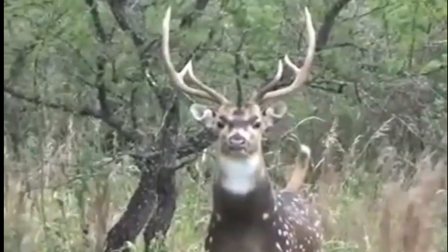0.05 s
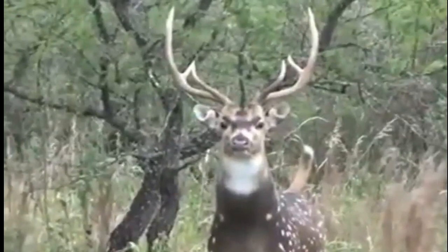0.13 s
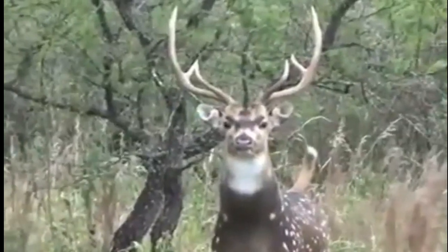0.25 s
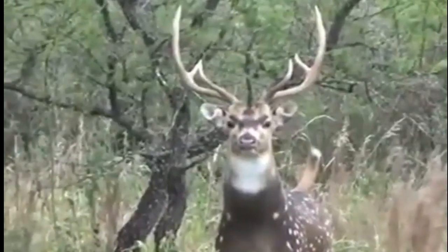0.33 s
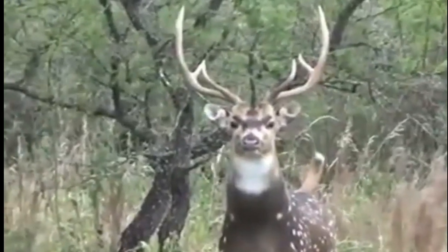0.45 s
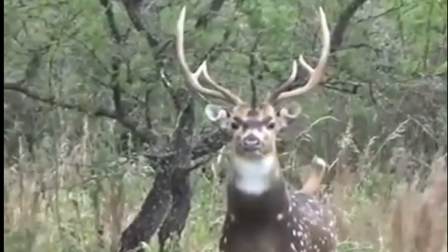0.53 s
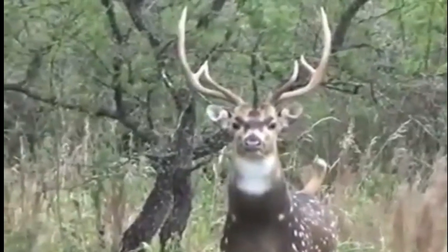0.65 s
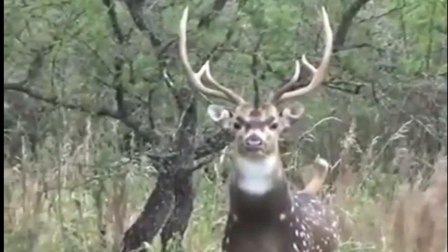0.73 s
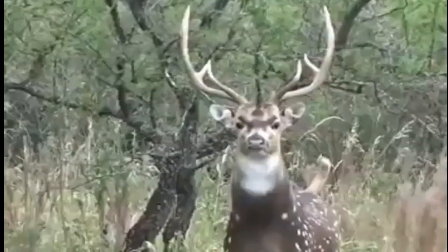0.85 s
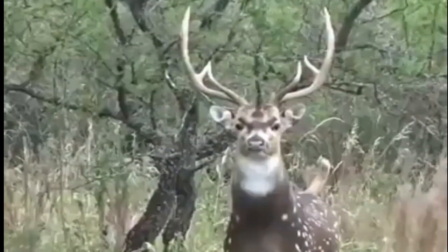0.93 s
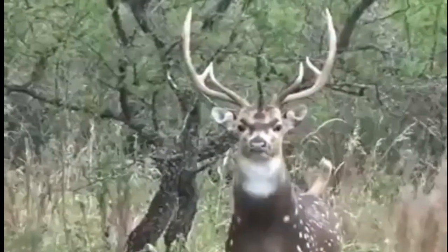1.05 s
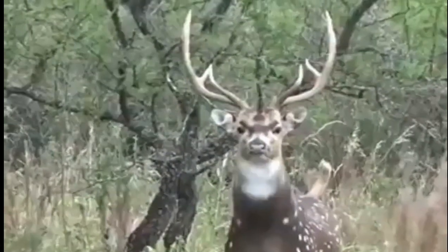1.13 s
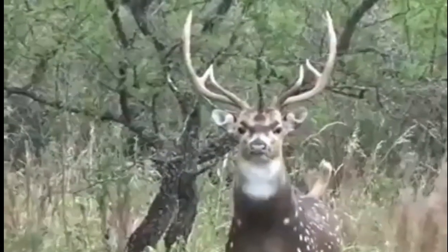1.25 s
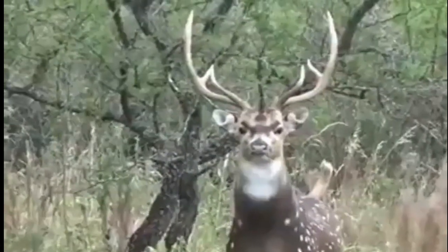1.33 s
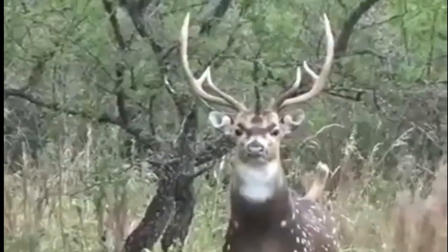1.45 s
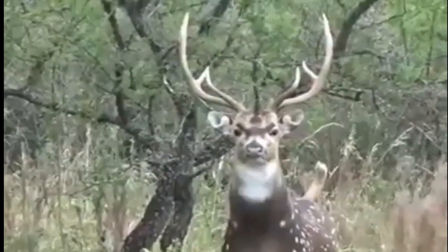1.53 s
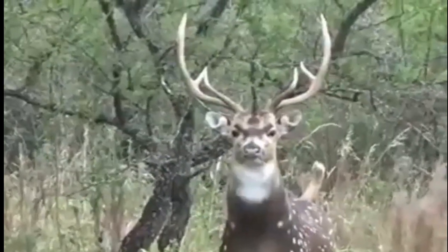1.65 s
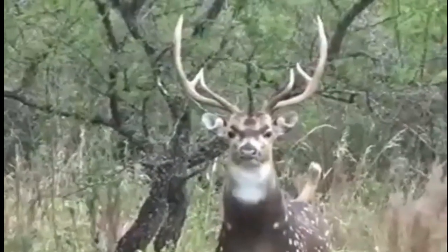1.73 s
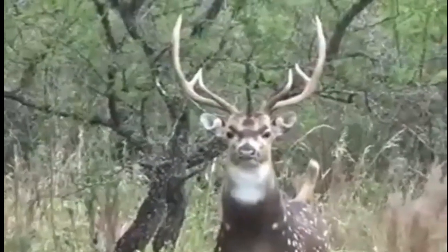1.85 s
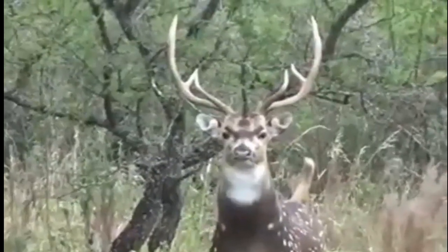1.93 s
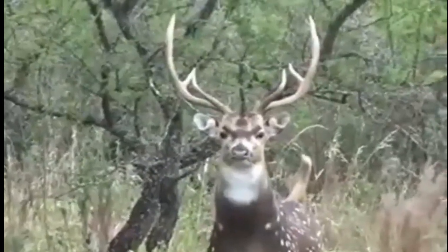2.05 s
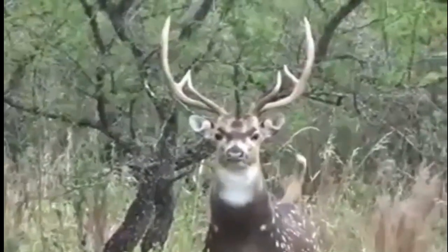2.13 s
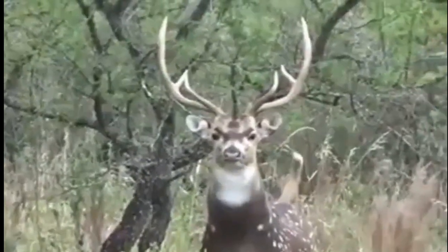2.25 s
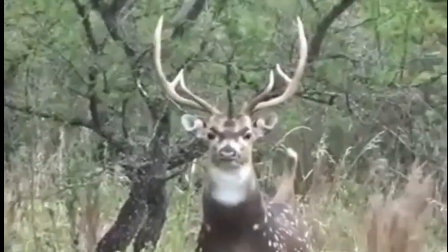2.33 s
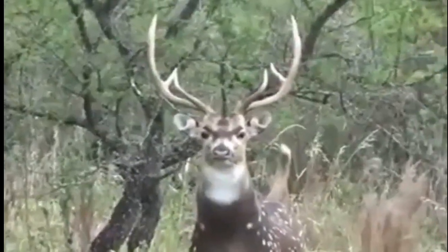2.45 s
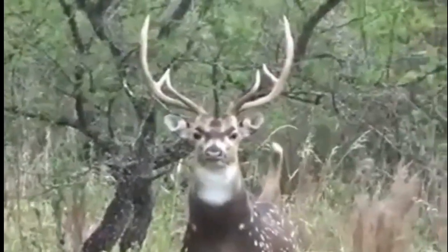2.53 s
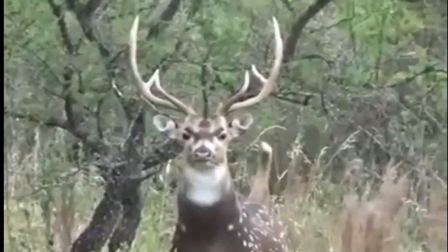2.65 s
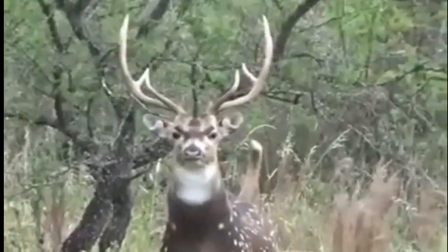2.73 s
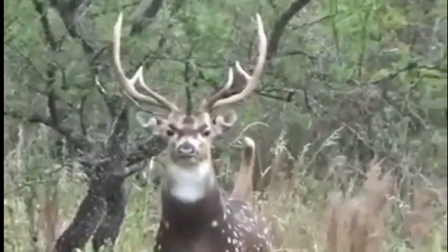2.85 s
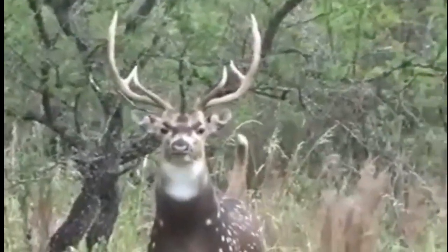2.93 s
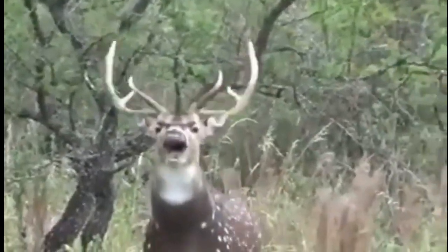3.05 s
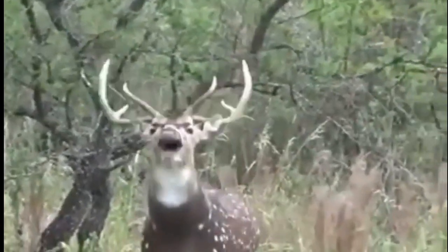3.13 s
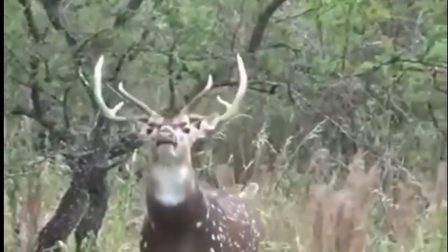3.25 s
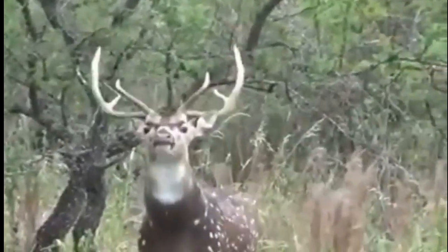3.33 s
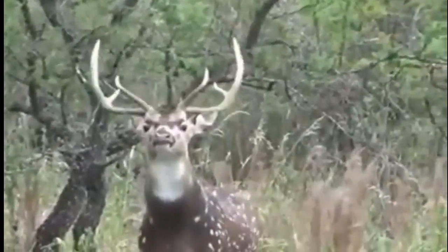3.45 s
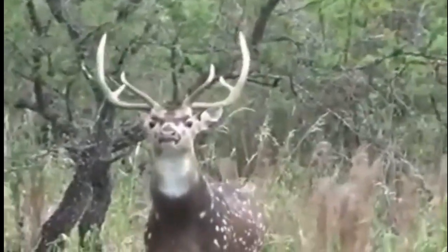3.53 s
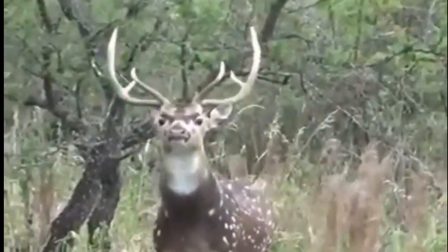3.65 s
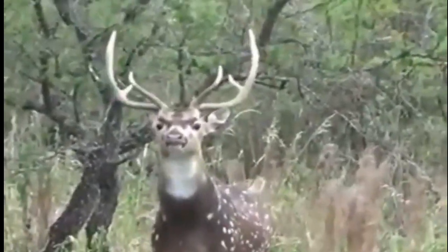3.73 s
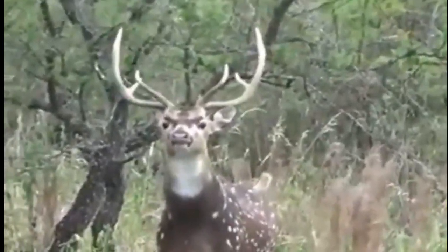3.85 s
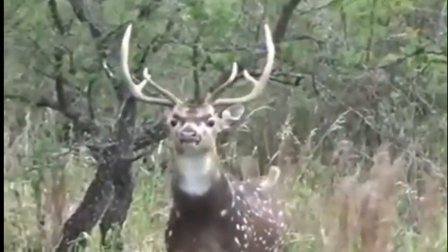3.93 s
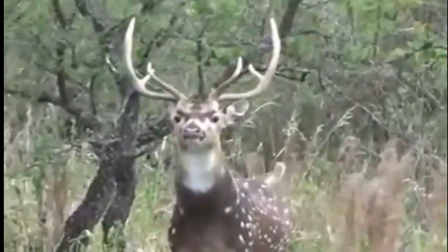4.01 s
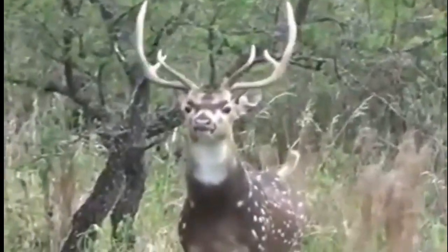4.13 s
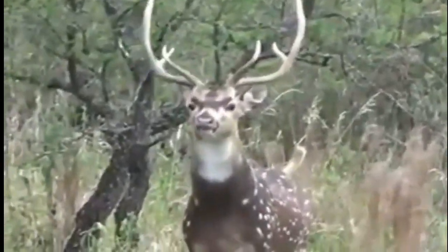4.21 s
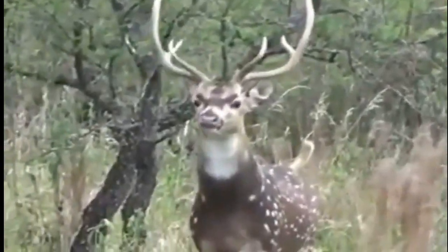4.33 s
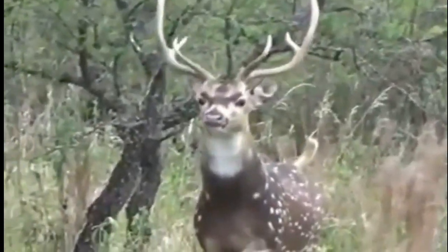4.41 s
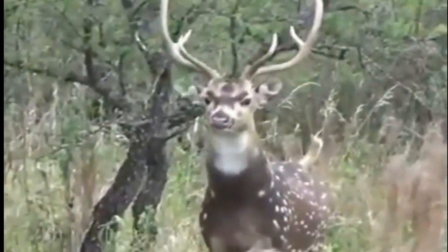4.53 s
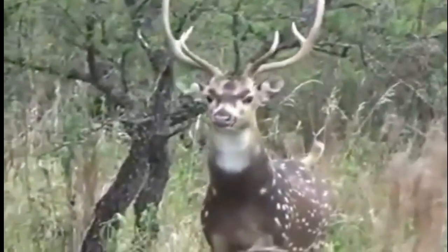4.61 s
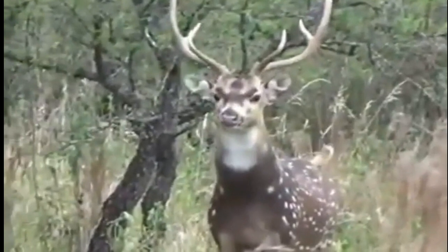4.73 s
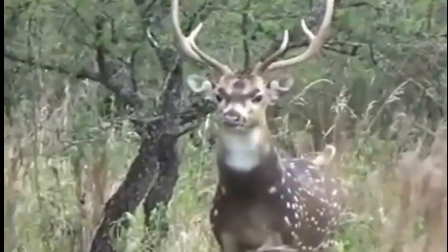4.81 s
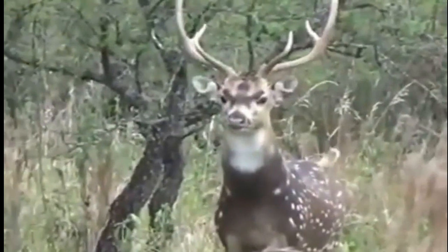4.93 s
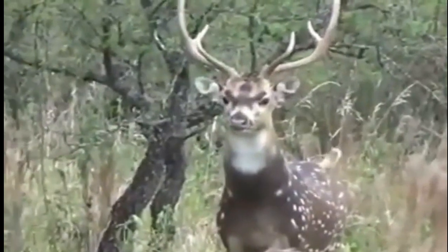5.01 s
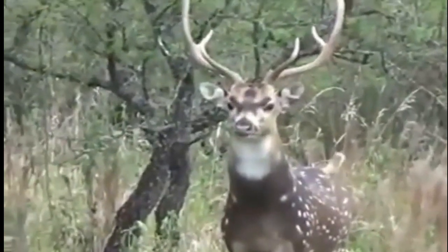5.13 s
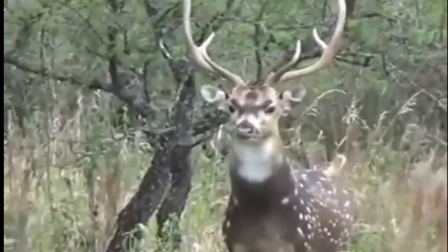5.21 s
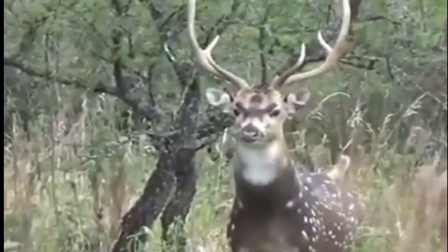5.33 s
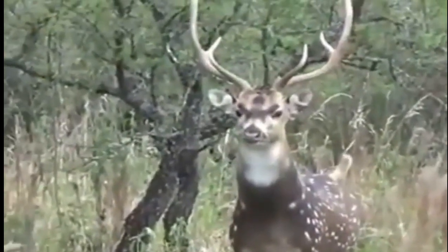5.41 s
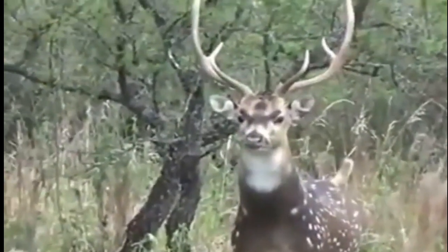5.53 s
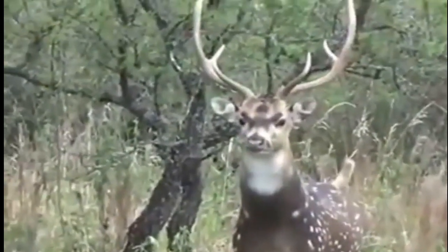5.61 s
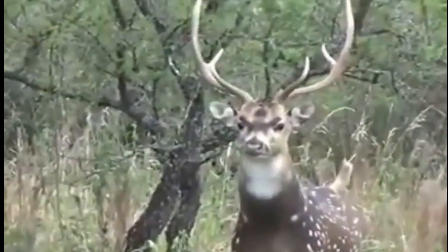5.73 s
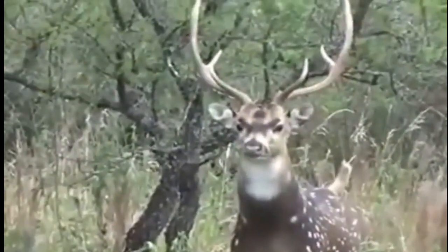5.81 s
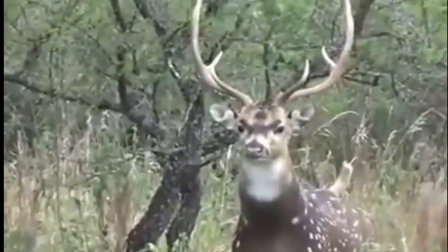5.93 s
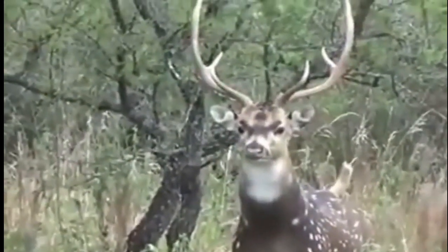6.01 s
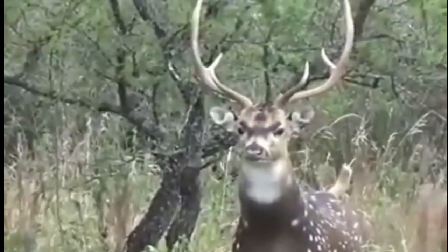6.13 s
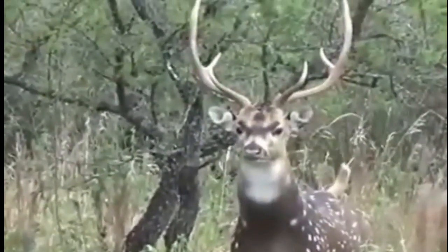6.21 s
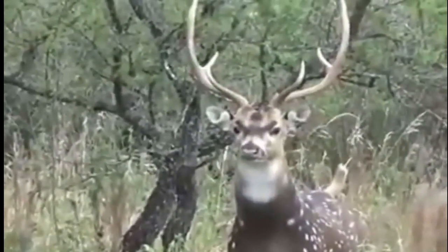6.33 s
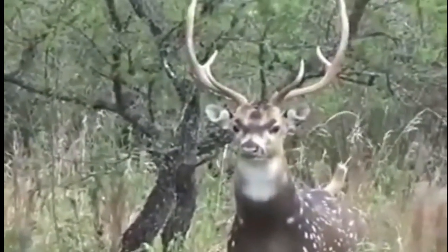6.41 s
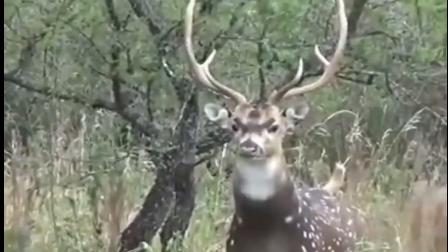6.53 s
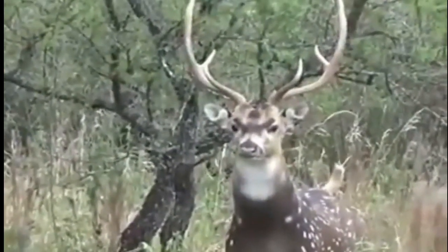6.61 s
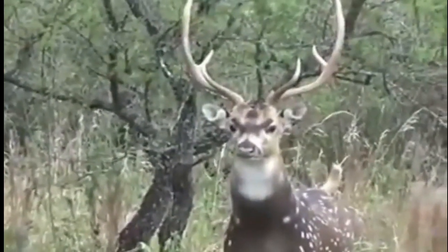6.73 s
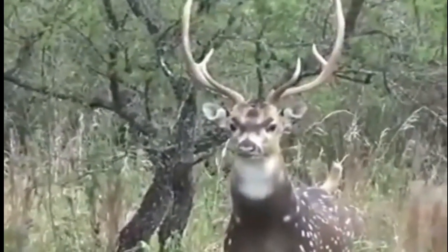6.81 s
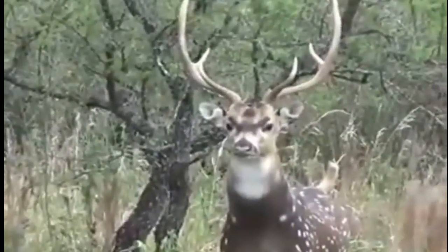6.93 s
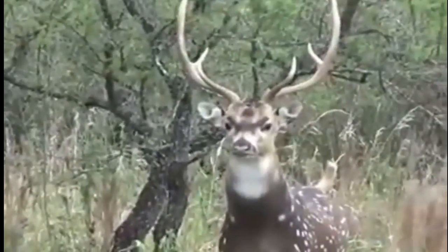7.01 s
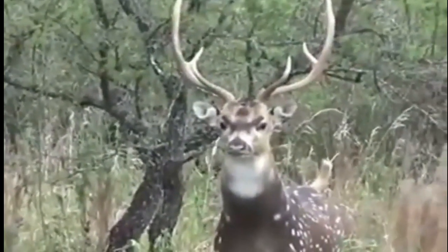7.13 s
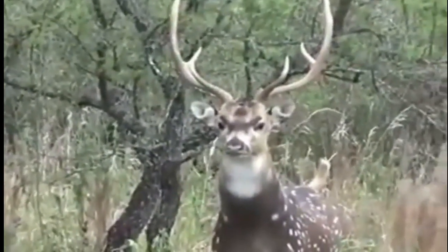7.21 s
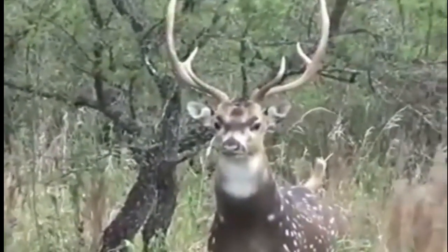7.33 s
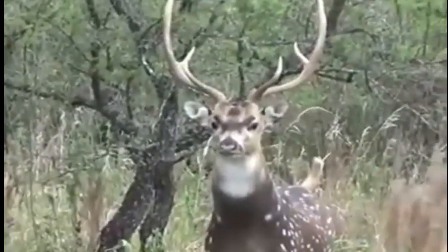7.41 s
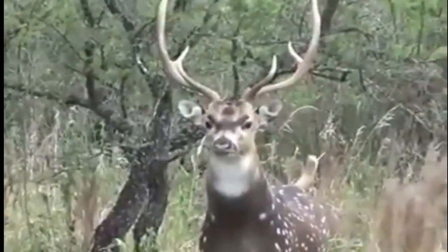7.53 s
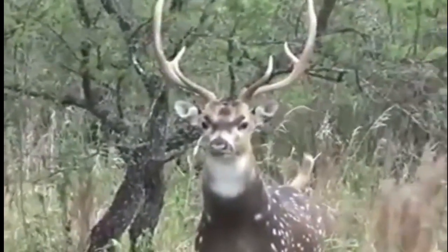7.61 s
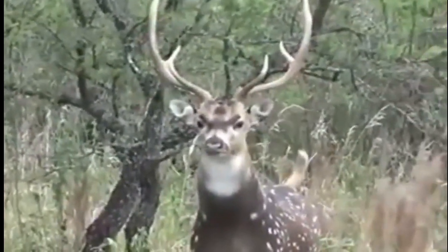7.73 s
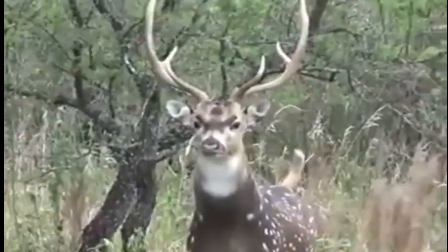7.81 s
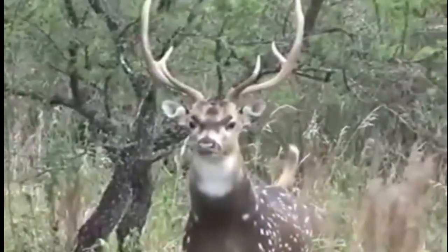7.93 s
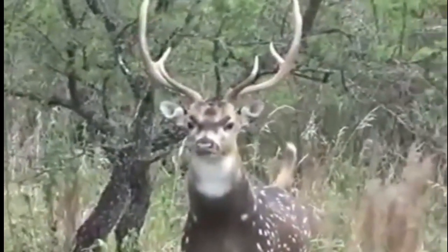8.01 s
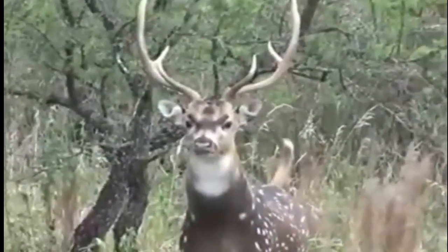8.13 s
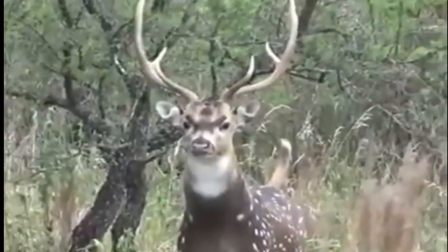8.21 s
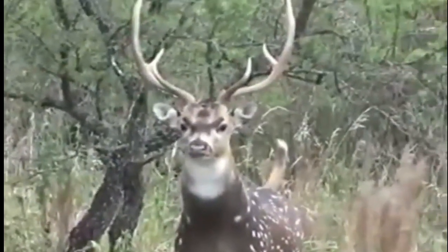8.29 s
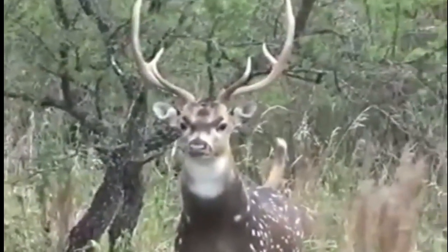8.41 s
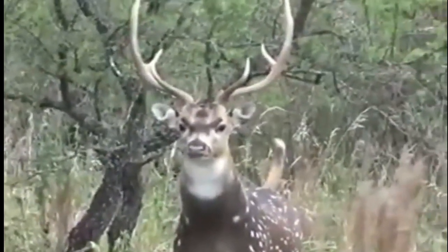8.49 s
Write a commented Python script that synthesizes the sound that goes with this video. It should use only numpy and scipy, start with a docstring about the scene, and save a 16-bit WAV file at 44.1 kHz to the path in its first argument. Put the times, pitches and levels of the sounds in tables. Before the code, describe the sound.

A soft, high cricket trill pulses throughout in runs with brief rests, over a faint insect chorus and quiet outdoor air. A very faint deer call sounds far off at about 0.5 seconds. Then a stag gives three loud, sharp alarm barks at about 1.7, 3.1 and 4.6 seconds, each roughly a third of a second long. Each is a high, nearly pure yelp with some rasp and breath that scoops up, holds and collapses in pitch, followed by a short echo from the trees. Two quieter, hoarser barks answer from farther away at about 5.4 and 7.5 seconds. Several small dry twigs snap, mostly between 3 and 6 seconds. Distant birds whistle faint short notes in the first second, near 3 seconds, and again from about 6.3 seconds on. The barks stand far above everything else.

```python
"""A cricket trills in paired wing strokes over a chorus of others, and far birds whistle.
Then a stag gives high alarm barks at the edge of a thicket, and other deer answer from farther off.
Each bark is a nearly pure tone from the vocal folds, with rasp and hissing breath; its pitch
scoops up, holds and collapses. The trees scatter each bark back. A few dry twigs snap,
and faint low tones hang in the soft, distant air."""
import sys
import numpy as np
from scipy import signal
from scipy.fft import rfft, irfft
from scipy.io import wavfile

SR = 44100
rng = np.random.default_rng(int(sys.argv[2]) if len(sys.argv) > 2 else 0)


def log_audio(samples):
    """Write samples as a 16-bit WAV file to the path given in sys.argv[1]."""
    # one column per channel
    frames = np.atleast_2d(samples).T
    # limit to full scale, then quantise
    limited = np.clip(frames, -1, 1)
    pcm = np.round(limited * 32767).astype(np.int16)
    wavfile.write(sys.argv[1], SR, pcm)


N = 377496

# How long the woods ring: f/Hz, time to fade by 60 dB/s
WOODS_FADE = [(300, 0.85), (1000, 1.52), (2100, 1.61), (4000, .7), (9000, .35)]
# How alike the two ears hear the background: f/Hz, likeness (1 = the same)
EAR_LIKENESS = [(30, 1), (70, .88), (140, .4), (300, .25), (700, 0.31), (2000, 0.33), (6000, 0.23),
                (12000, .3)]
# Tone colours, saying how strong each frequency is: f/Hz, relative level/dB
ECHO_COLOUR = [(300, -0.5), (1000, 4), (2100, -3.5), (4000, -4), (10000, -14.5)]  # sound scattered by trees
AIR_COLOUR = [(15, -41.5), (25, -9), (92, -2.5), (119, -2), (382, -4), (436, -3.5), (487, -4), (663, -0.5),
              (1740, -11.5), (3230, -9.5), (4800, -15), (6240, -42), (10600, -120)]  # distant air
INSECT_COLOUR = [(4000, -22.5), (4800, -15.5), (5450, -2), (5950, -9), (6400, 1.5), (6750, -11.5),
                 (7200, -24.5), (9000, -19.5), (10500, -27.5), (11900, -16.5), (13000, -32)]  # countless far insects
RASP_COLOUR = [(100, -35), (420, -24.5), (650, -6.5), (1000, -18.5), (1450, -7.5), (1950, 1), (2450, -8.5),
               (3450, -3), (3800, -9.5), (4200, -19.5), (5200, -19), (7000, -30.5), (14000, -55)]  # a hoarse throat
HISS_COLOUR = [(1500, -33.5), (3000, -5), (4400, -8), (5300, -6), (6500, -7), (7500, 0.5), (8700, 0),
               (10200, 0), (11500, -7), (13500, -21.5)]  # escaping breath
OVERTONE_COLOUR = [(3000, 1.5), (4300, 7), (5400, -0.5), (6500, -3.5), (7600, 1), (8700, 2), (9800, -15.5),
                   (11000, -15.5), (13000, -20.5)]  # a bark's harmonics 4 to 12 (multiples of its pitch)
RUMBLE_COLOUR = [(25, -6), (85, -4), (200, -6), (400, -8), (800, -11), (3000, -40)]  # low rumble of the overloaded microphone under the loudest barks
# Faint far tones: t/s, length/s, f/Hz, level/dB
FAR_TONES = [(-.1, .48, 436, -64.5), (3.6, 0.56, 187, -68.5), (3.622, 0.394, 373.5, -67),
             (8.05, 0.512, 454.3, -71)]
# Far crickets: f/Hz, stroke rate/Hz, level/dB
FAR_CRICKETS = [(6500, 16, -59.5), (6280, 29, -62.5), (6603, 42, -63), (5420, 35, -58.5)]
# Bird notes: t/s, length/s, middle f/Hz, arch/share of f (below 0: a dip), buzz/share of f, level/dB
BIRD_NOTES = [(0.264, 0.106, 4010, .175, 0.03, -58.5), (.528, .059, 3920, .2, 0.0047, -53.5),
              (0.585, 0.04, 2700, -.06, .005, -54.5), (0.754, 0.2143, 3116, .12, .005, -56.5),
              (2.997, 0.0623, 3320, .095, .022, -56.5), (6.28, 0.0743, 3160, .04, 0.0445, -54.5),
              (6.425, 0.047, 3260, .06, .07, -57), (6.511, 0.028, 3540, .18, .047, -56.5),
              (6.57, .095, 3310, .075, 0.055, -54), (6.917, .059, 3700, .115, .018, -58.5),
              (7.825, .069, 3000, -0.015, 0.0098, -60), (8.127, .077, 3100, -0.33, 0.0093, -57.5),
              (8.343, 0.0728, 3450, .145, 0.018, -55.5)]
# Runs of the near cricket: first chirp t/s, last chirp t/s, level/dB
CRICKET_RUNS = [(-.005, 0.511, -45.5), (0.664, 1.299, -45), (1.685, 2.707, -46.5), (2.93, 3.153, -47),
                (3.426, 4.395, -47), (4.643, 5.499, -46), (5.807, 6.497, -45), (6.689, 7.204, -44.5),
                (7.42, 8.228, -45), (8.449, 8.563, -45)]
# Snapping twigs: t/s, peak level before gain_db/dB, centre f/Hz, time to fade by 60 dB/s
TWIG_SNAPS = [(1.136, -47, 2950, 0.078), (3.115, -38, 1865, 0.044), (3.534, -30, 2490, 0.049),
              (3.6, -41, 1000, 0.048), (3.832, -31.5, 2618, .035), (4.3, -31.5, 1396, 0.026),
              (4.588, -30.5, 1680, 0.023), (5.707, -41, 2520, 0.057), (6.044, -28.5, 956, 0.033)]
# The course of each bark: t/s, length/s, f/Hz, scoop/share of f, hold/s, fall/share of f, attack/s,
# release/s, level/dB, drift/(dB per s), second harmonic/dB, third harmonic/dB, breath/dB (these three
# relative to the level), swell time after the start/s, strain (-1 to 1)
BARK_SHAPES = [ (.485, 0.25, 1287, 0.027, 0.077, .24, 0.012, 0.089, -46.5, 12, -17, -39, -30, .075, 0.15),
               (1.654, 0.35, 1056, .112, .187, 0.4, 0.026, 0.099, -15.5, 2, -3, -34, -33.5, .125, -0.23),
               (3.134, 0.27, 1101, 0.22, 0.11, 0.54, 0.017, 0.071, -15.5, 8.5, -0.65, -23.5, -23, 0.11, 0.63),
               (4.622, 0.33, 1082, 0.19, 0.16, 0.44, 0.053, 0.1, -13, -10.5, -3.5, -31, -32.5, 0.049, 0.26),
               (5.446, .189, 1257, .088, .127, 0.44, 0.021, 0.036, -29.5, -52.5, -6, -24.5, -16, 0.097, 0),
               (7.489, 0.2, 1110, 0.077, 0.026, 0.37, .022, .08, -28, 49, -5.5, -26, -46.5, 0.068, 0.63), ]
# The voice of each bark: left over right/dB, jitter/share of f, rasp over voice/dB, ring over rasp/dB,
# overtones over breath/dB, hiss over breath/dB, hiss tilt/(dB per octave), screech over breath/dB,
# second fold/share of the first, echo/dB
BARK_VOICES = [ (-1, .0023, -33, -20, -5, -6.5, -6.5, -10.5, .12, -8),
               (6.5, .003, -30.5, -20, -1.5, -9, -6.5, 9, 0.0032, -16),
               (.5, .0057, -23, -24, -7.5, -3.5, 9, -6.5, .05, -17.5),
               (6, .003, -33, -20, -1.5, -5, -14, 14, 0, -16.5),
               (1.5, 0.012, -22, -4, -13, -10.5, -2, -23, 0.61, -8),
               (2.5, 0.01, -14.5, -3.5, -4, -3, 6, 11, 0.023, -10), ]


def amp(db):
    """Turns decibels into a number to multiply by."""
    return 10 ** (np.asarray(db) / 20)


def unit(x):
    """Scales a signal to an average strength (rms) of 1."""
    return x / np.sqrt(np.mean(x ** 2) + 1e-20)


def read(points, hz):
    """Reads between a table's rows, with octaves evenly spaced."""
    f, value = np.transpose(points)
    return np.interp(np.log(hz + 1), np.log(f + 1), value)


def add(mix, s, sound):
    """Mixes a sound in at s seconds."""
    start = round(s * SR)
    sound = sound[..., max(-start, 0):]
    part = mix[..., max(start, 0):][..., :sound.shape[-1]]
    part += sound[..., :part.shape[-1]]


def pan(x, side_db):
    """Places a sound between the ears, side_db louder on the left."""
    gains = amp([[side_db / 2], [-side_db / 2]])
    return x * gains / gains.mean()


def noise(colour, size):
    """Noise of strength 1 with the given tone colour."""
    gains = amp(read(colour, np.fft.rfftfreq(size, 1 / SR)))
    return unit(irfft(rfft(rng.standard_normal(size)) * gains, size))


def wander(rate_hz, size):
    """A smooth random wobble of strength 1, mostly slower than rate_hz."""
    hz = np.fft.rfftfreq(size, 1 / SR)
    return unit(irfft(rfft(rng.standard_normal(size)) * (hz > 0) / (1 + (hz / rate_hz) ** 2), size))


def surrounding_noise(colour):
    """Noise from all around: partly alike in the two ears."""
    alike = np.clip(read(EAR_LIKENESS, np.fft.rfftfreq(N, 1 / SR)), 0, 1)
    mid = noise(colour, N)
    side = irfft(rfft(noise(colour, N)) * np.sqrt((1 - alike) / (1 + alike)), N)
    return np.array([mid + side, mid - side])


def note(length, pitch_hz, arch, buzz, db, droop=0):
    """A tone that arches and droops, pure or buzzy."""
    u = np.linspace(-1, 1, round(length * SR))  # -1 at the start, 1 at the end
    hz = pitch_hz * (1 - arch * u ** 2 - droop * u) * (1 + buzz * wander(250, len(u)))
    return amp(db) * np.sin(2 * np.pi * np.cumsum(hz) / SR) * signal.windows.tukey(len(u), .25)


def woods(x, echoes_per_s=2500, near_fade_s=.66, tree_line_s=.165):
    """Trunks scatter sound: a quick near spray, a swell from the tree line, and a long thin tail."""
    taps = rng.standard_normal((3, 2 * SR)) * (rng.random((3, 2 * SR)) < echoes_per_s / SR)
    hz, t, spectrum = signal.stft(taps[:2] + .5 * taps[2], SR, nperseg=256)  # both ears share row 2
    far = amp(-12.5 - 60 * t / read(WOODS_FADE, hz)[:, None])
    near = amp(2 - 60 * t / near_fade_s)
    tree_line = amp(-10) * np.exp(-((t - tree_line_s) / .017) ** 2)
    shape = np.sqrt(far ** 2 + near ** 2 + tree_line ** 2) * np.clip(t / .0052, 0, 1)
    tail = signal.istft(spectrum * shape, SR, nperseg=256)[1]
    colour = amp(read(ECHO_COLOUR, np.fft.rfftfreq(tail.shape[1], 1 / SR)))
    tail = irfft(rfft(tail) * colour) / np.linalg.norm(tail[0])
    return signal.fftconvolve(x[None], tail, axes=1)[:, :N]


def distance(air_db=-61, hum_hz=90.8, hum_db=-70.5, hum_db_per_s=-1):
    """Soft air, a fading low hum and far tones."""
    air = amp(air_db) * surrounding_noise(AIR_COLOUR)
    hum_gain = amp(hum_db + hum_db_per_s * np.arange(N) / SR + wander(.7, N))
    hum = hum_gain * np.sqrt(2) * np.sin(2 * np.pi * np.cumsum(hum_hz + wander(3.3, N)) / SR)
    tones = np.zeros(N)
    for s, length, hz, db in FAR_TONES:
        add(tones, s, note(length, hz, arch=.018, buzz=.01, db=db))
    return air + hum + tones


def wing_stroke(pitch_hz, length, arch_hz, fall_hz):
    """A cricket's ridged wing speeds up and slows as it scrapes, so the tone arches."""
    u = np.linspace(-1, 1, round(length * SR))
    hz = pitch_hz - arch_hz * u ** 2 - fall_hz * u
    return np.sin(2 * np.pi * (np.cumsum(hz) / SR + rng.random())) * signal.windows.tukey(len(u), .65)


def cricket_chorus(haze_db=-59):
    """Far crickets, each with its own falling stroke, in a haze of countless others."""
    out = np.zeros((2, N))
    for pitch_hz, rate, db in FAR_CRICKETS:
        for s in np.arange(0, N / SR, 1 / rate):
            late, loud, detune = rng.standard_normal(3)
            tone = wing_stroke(pitch_hz + 40 * detune, length=.014, arch_hz=60, fall_hz=170)
            add(out, s + .0033 * late, amp(db + 2 * loud) * tone)
    return out + amp(haze_db) * surrounding_noise(INSECT_COLOUR)


def birds(arch_droop=.034, dip_droop=.17, faint_per_s=.9, faint_hz=3200, echo_db=-4):
    """Far birds whistle a few clear notes, and fainter ones at random."""
    out = np.zeros(N)
    for s, length, hz, arch, buzz, db in BIRD_NOTES:
        add(out, s, note(length, hz, arch, buzz, db, arch_droop if arch > 0 else dip_droop))
    for s in np.arange(0, N / SR, 1 / faint_per_s):
        late, high, bend = rng.uniform(-1.2, 1, 3)
        hz = faint_hz * (1 + .12 * high)
        faint = note(.077, hz, arch=.14 * (bend + .5), buzz=.012, db=-63.5, droop=arch_droop)
        add(out, s + abs(late) / faint_per_s, faint)
    return out + amp(echo_db) * woods(out)


def near_cricket(pitch_hz=5750, chirp_every_s=.0572, pair_gap_s=.0195, stroke_s=.016, echo_db=-9):
    """One cricket trills in runs of double wing strokes, with short rests."""
    out = np.zeros(N)
    for first, last, db in CRICKET_RUNS:
        for s in np.linspace(first, last, round((last - first) / chirp_every_s) + 1):
            for delay in (0, pair_gap_s):
                tone = wing_stroke(pitch_hz + 10 * rng.standard_normal(), stroke_s, 234, fall_hz=30)
                add(out, s + delay - stroke_s / 2, amp(db + .7 * rng.standard_normal()) * tone)
    return pan(out, side_db=1) + amp(echo_db) * woods(out)


def twigs(gain_db=-3, width_octaves=1.4, low_cut_hz=500, echo_db=-16):
    """Dry twigs snap: each is a short burst of broad noise that dies at once."""
    out, t = np.zeros(N), np.arange(4096) / SR
    hz = np.fft.rfftfreq(len(t), 1 / SR) + 1
    for s, db, centre_hz, fade_s in TWIG_SNAPS:
        hump = np.exp(-(np.log2(hz / centre_hz) / width_octaves) ** 2)
        colour = (hump + .043) / (1 + (low_cut_hz / hz) ** 4)
        burst = irfft(rfft(rng.standard_normal(len(t))) * colour)
        crack = burst * amp(-60 * t / fade_s) * np.minimum(t / .0013, 1)
        add(out, s, amp(db + gain_db) * crack / abs(crack).max())
    return out + amp(echo_db) * woods(out)


def whistling(centre_hz, width_hz):
    """Rushing air rings around one frequency, which may move."""
    turn = 2 * np.pi * np.cumsum(centre_hz) / SR
    return wander(width_hz, len(turn)) * np.cos(turn) + wander(width_hz, len(turn)) * np.sin(turn)


def breath_hiss(phase, db, tilt_db, width=.55):
    """Air escapes in one puff for each cycle of the vocal folds."""
    n = len(phase)
    colour = [(f, colour_db + tilt_db * np.log2(f / 8000)) for f, colour_db in HISS_COLOUR]
    hiss = noise(colour, n) + width * np.array([[1], [-1]]) * noise(colour, n)
    return hiss * amp(db + wander(40, n)) * (1 + 1.5 * np.cos(phase))


def bark_course(length, pitch_hz, scoop, hold_s, fall, attack_s, release_s, db, db_per_s,
                second_db, third_db, breath_db, swell_s, strain, scoop_s=.083):
    """Pitch and levels through one bark: it scoops up, holds, then collapses as the folds go slack."""
    t = np.arange(1, round(length * SR)) / SR
    catch = np.exp(-(t / .02) ** 2)  # the folds catch at the start, favouring the second harmonic
    swell = np.exp(-((t - swell_s) / .056) ** 2)  # mid-cry lift of the third harmonic and the breath
    effort = strain * swell  # lowers the pitch and the second harmonic, adds rasp
    release = np.clip(1 - (length - t) / release_s, 0, 1) ** 1.176
    rising = 1 - scoop * np.clip(1 - t / scoop_s, 0, 1) ** 2
    falling = 1 - fall * np.clip((t - hold_s) / (length - hold_s), 0, 1) ** 1.96
    hz = pitch_hz * rising * falling * (1 - .108 * effort)
    # these six levels are in dB
    level = db + db_per_s * t + 30 * np.log10(np.minimum(t / attack_s, 1)) - 30 * release
    first = level - 5.5 * catch
    second = level + second_db + 3.5 * catch - 12 * effort + .5 * release
    third = level + third_db + 11.5 * swell + 8.5 * release
    breath = level + breath_db + 4.5 * swell + 2 * release
    hoarse = level + 5 * effort
    # extra rasp as the folds catch, and as they give way
    breaking = amp(level) * (amp(-14.5) * catch + amp(-11) * release)
    return hz, (first, second, third), breath, hoarse, breaking, catch


def bark(shape, jitter, rasp_db, ring_db, overtone_db, hiss_db, tilt_db, screech_db, second_fold,
         fold_ratio=1.075, ring_hz=3390, opening_hz=(5900, 10000), closing_hz=4950):
    """A nearly pure arched cry with rasp and hiss; it screeches as the pitch collapses."""
    hz, harmonics_db, breath_db, hoarse_db, breaking, catch = bark_course(*shape)
    n = len(hz)
    sag = np.clip(1 - hz / hz.max(), 0, .4) * 4  # 0 at the top of the arch, up to 1.6 on slack folds
    progress = np.linspace(0, 1, n)
    throat_hz = np.interp(progress, [.13, .65], opening_hz)  # rings higher as the mouth opens
    phase = 2 * np.pi * np.cumsum(hz * (1 + (jitter + .023 * sag) * wander(170, n))) / SR
    blur = .65 * (.44 + 3 * progress ** 2 + 2 * sag * progress)
    # two folds out of tune beat against each other, once the cry is under way
    split = second_fold * np.clip(1.2 - 5 * sag, 0, 1) * (1 - catch)
    voice = np.zeros(n)
    for turn, share in ((phase, 1), (phase * fold_ratio, split)):
        for k, db in enumerate(harmonics_db, 1):
            voice += share * amp(db) * np.sin(k * turn)
        # high overtones start clear and blur, come and go, and flare as the throat's ring sweeps past
        for k in range(4, 13):
            flare_db = 17 * (1 - progress) ** 2 * np.exp(-((k * hz - throat_hz) / 1100) ** 2)
            db = breath_db + overtone_db + read(OVERTONE_COLOUR, k * hz) + flare_db + 3 * wander(20, n)
            voice += share * amp(db) * np.cos(k * turn + blur * wander(300, n)) / 2
    tremble = .023 * (1 + 7 * sag + 4 * catch)
    voice *= np.sqrt(2) * (1 + tremble * wander(74, n))
    rasp = noise(RASP_COLOUR, n) + amp(ring_db) * whistling(np.full(n, ring_hz), width_hz=90)
    rasp *= amp(hoarse_db + rasp_db) + breaking
    shrill = amp(breath_db - 7) * whistling(throat_hz, width_hz=450)
    closing = np.clip(4 * sag, 0, 2) * progress ** 2  # the closing mouth screeches on a lower ring
    screech = amp(breath_db + screech_db) * closing * whistling(np.full(n, closing_hz), width_hz=450)
    rumble = amp(2 * harmonics_db[0] - 26) * noise(RUMBLE_COLOUR, n)  # the overloaded microphone
    hiss = breath_hiss(phase, breath_db + hiss_db, tilt_db)
    return (voice + rasp + shrill + screech + rumble + hiss) * signal.windows.tukey(n, .03)


def deer():
    """Every bark reaches the ears straight and by way of the trees."""
    direct, to_trees = np.zeros((2, N)), np.zeros(N)
    for (s, *shape), (side_db, *voice, echo_db) in zip(BARK_SHAPES, BARK_VOICES):
        cry = bark(shape, *voice)
        add(direct, s, pan(cry, side_db))
        add(to_trees, s, amp(echo_db) * cry.mean(0))
    return direct + woods(to_trees)


def scene():
    """All sources together."""
    return deer() + twigs() + near_cricket() + cricket_chorus() + birds() + distance()


def record(dry):
    """Cuts away the treble above 13700 Hz."""
    low_pass = signal.firwin(511, 13700, window=("kaiser", 9), fs=SR)
    return signal.oaconvolve(dry, low_pass[None], "same")


dry = scene()
out = record(dry)
log_audio(out)
```